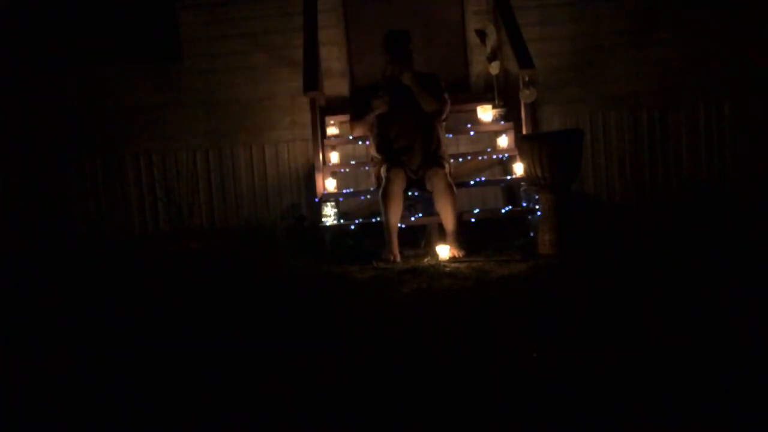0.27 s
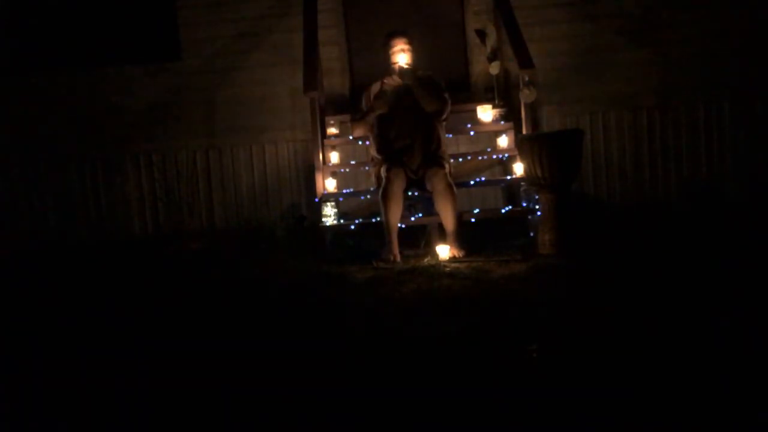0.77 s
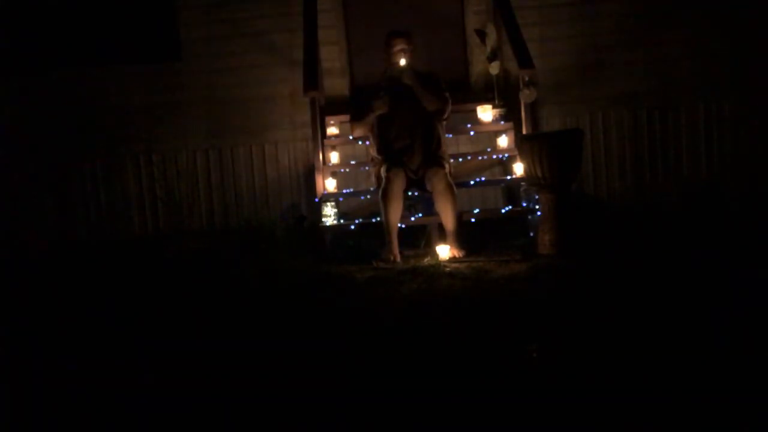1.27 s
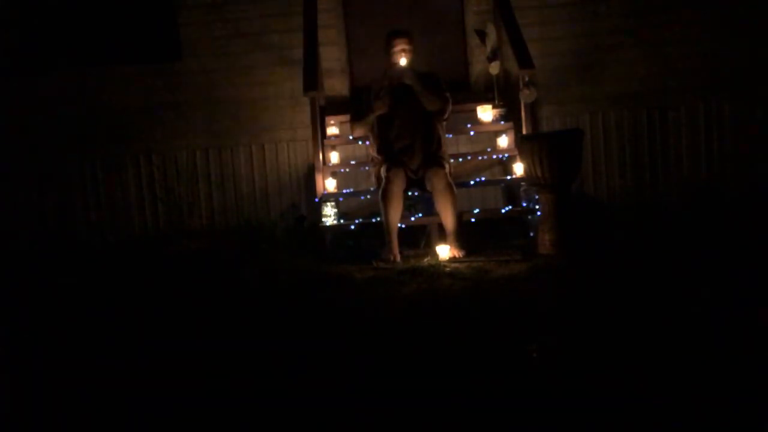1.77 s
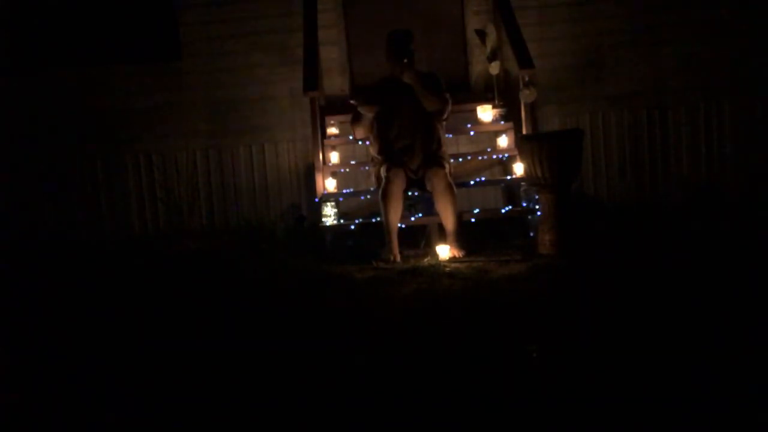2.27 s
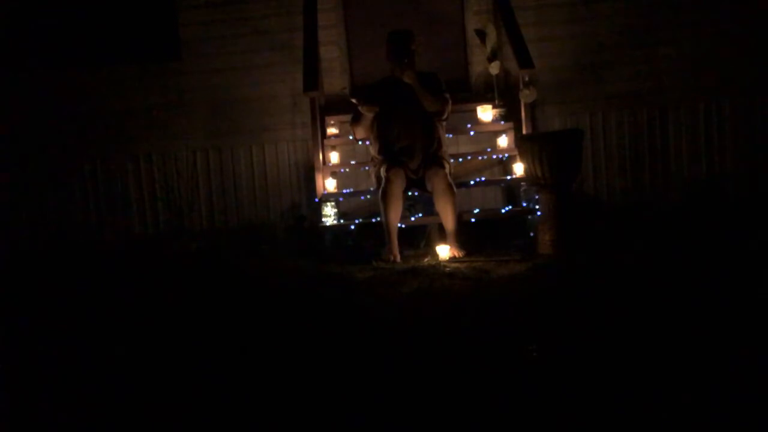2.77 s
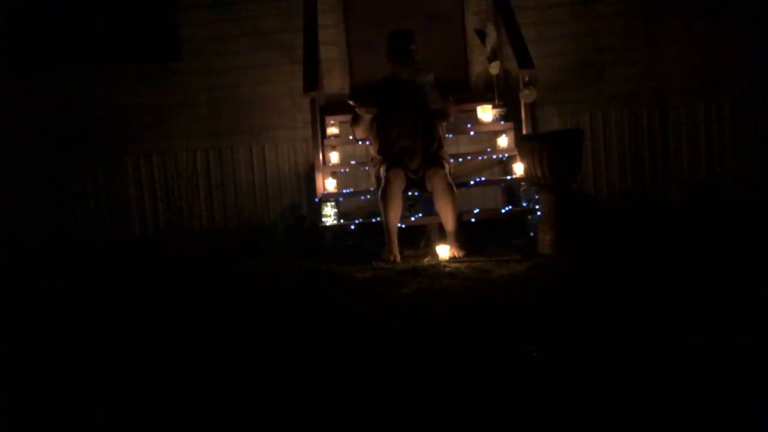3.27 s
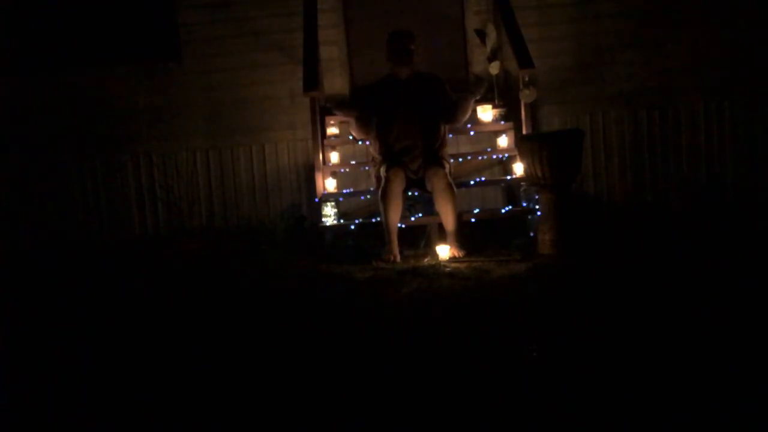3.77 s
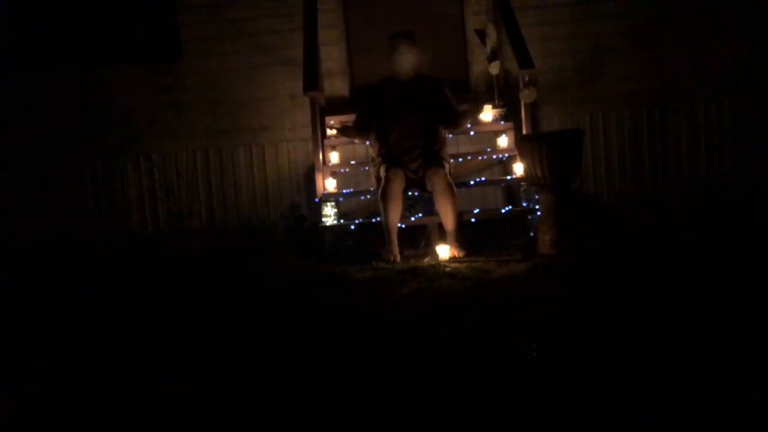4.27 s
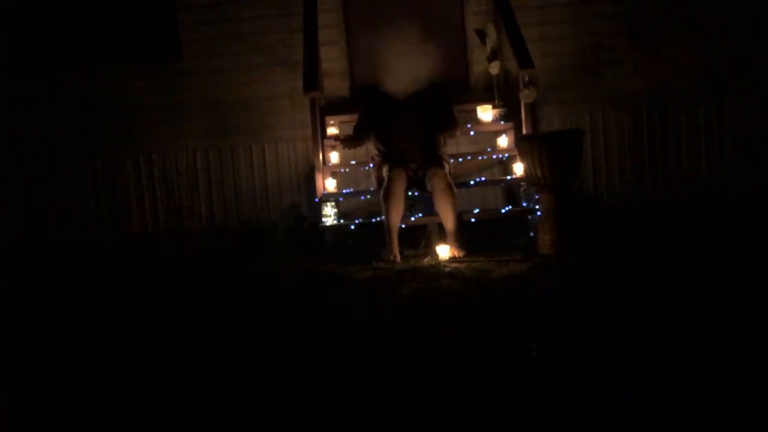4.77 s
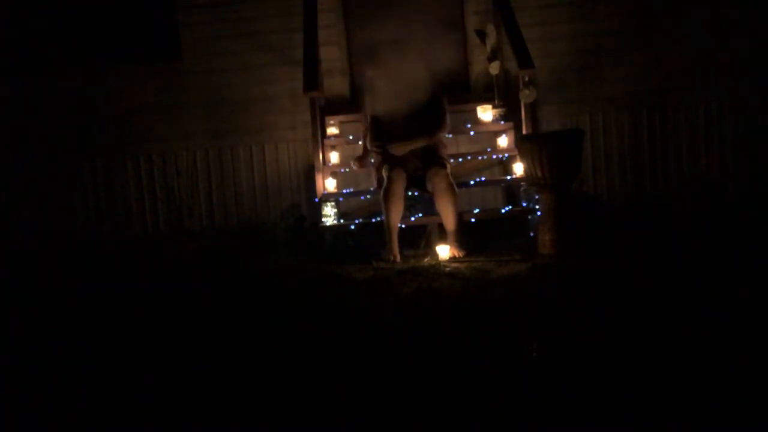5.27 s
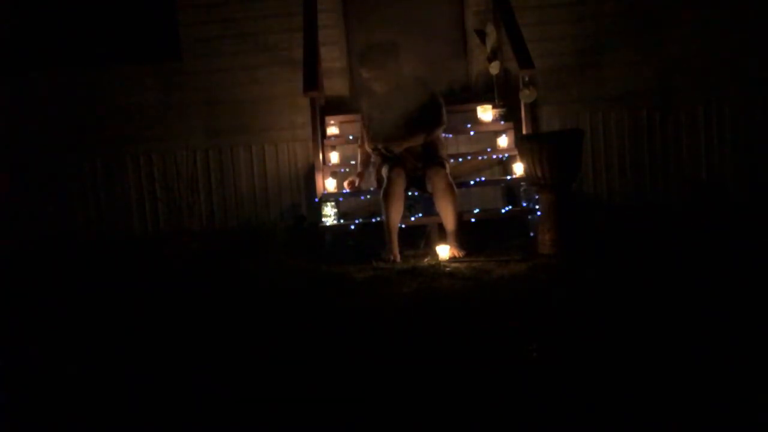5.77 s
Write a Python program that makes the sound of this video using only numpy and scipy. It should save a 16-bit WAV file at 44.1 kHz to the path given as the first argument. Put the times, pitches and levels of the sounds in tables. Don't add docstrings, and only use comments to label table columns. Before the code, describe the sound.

Outdoors at night, a crowd of katydids dominates with raspy phrases swelling about twice a second, never quite silent. A lighter clicks sharply at half a second, and two tiny taps follow near two seconds. Faint frog pips, distant engine, hum and traffic lie below. Late, soft knocks sound on wooden steps. One microphone, the same in both channels.

```python
import sys
import numpy as np
from scipy import signal
from scipy.fft import rfft, irfft, next_fast_len
from scipy.io import wavfile
from scipy.ndimage import uniform_filter1d, map_coordinates

SR = 44100
rng = np.random.default_rng(int(sys.argv[2]) if len(sys.argv) > 2 else 0)


def to_wav(s):
    ch = np.atleast_2d(s).T
    pcm = np.round(np.clip(ch, -1, 1) * 32767)
    wavfile.write(sys.argv[1], SR, pcm.astype(np.int16))


def voltage_ratio(level):
    return 10 ** (np.asarray(level, float) / 20)


N = 265261
TIME = np.arange(N) / SR


def unit(x):
    return x / np.sqrt(np.mean(x ** 2) + 1e-20)


def wobble(rate_hz):
    knots = rng.standard_normal(int(N * rate_hz / SR) + 4)
    return map_coordinates(knots, [np.arange(N) * rate_hz / SR])


def swells(rows):
    return sum(db * np.exp(-((TIME - s) / half_s) ** 2) for s, half_s, db in rows)


def filtered(x, response):
    m = next_fast_len(N + SR // 2)
    return irfft(rfft(x, m) * response(np.fft.rfftfreq(m, 1 / SR)), m)[:N]


def resonance(f, hz, width_hz):
    damping = 1j * f * width_hz
    return damping / (hz * hz - f * f + damping)


def coloured(x, spectrum):
    f, db = np.transpose(spectrum)
    return unit(filtered(x, lambda hz: voltage_ratio(np.interp(np.log(hz + 1), np.log(f + 1), db))))


def add_at(out, start_s, sound):
    out[..., round(start_s * SR):][..., :sound.shape[-1]] += sound


def singers(teeth_hz, sharp, stroke_db, blur):
    total = np.zeros(N)
    for _ in range(3):
        rate = teeth_hz * (1 + 0.05 * rng.standard_normal() + 0.04 * wobble(8))
        cycle = np.cumsum(rate) / SR % 1
        strokes = voltage_ratio(stroke_db * wobble(14))
        total += unit(strokes * np.exp(-sharp * cycle) * rng.standard_normal(N))
    return unit(total) + blur * rng.standard_normal(N)


def ringing(count, lo_hz, hi_hz, life_s, spread_db):
    start, pitch, strength = rng.random((3, count, 1))
    t = np.arange(1300) / SR
    hz = lo_hz + (hi_hz - lo_hz) * pitch
    notes = voltage_ratio(spread_db * strength) * t * np.exp(-t / life_s) * np.sin(2 * np.pi * hz * t)
    at = (start * N).astype(int) + np.arange(len(t))
    return unit(np.bincount(at.ravel(), notes.ravel(), N)[:N])


# start_s, length_s, strength_db, growth_db, near_extra_db
KATYDID_PHRASES = [(-.3, 0.3, -0.9, 0.5, -1), (0.237, 0.29, -3, -3.5, 2.5), (0.618, 0.21, 1.2, 0.5, -2.5),
                   (1.057, 0.29, -3.5, 1, 0.5), (1.463, 0.23, 0.3, -2.7, -1.5), (1.843, 0.34, -3, 2.1, .3),
                   (2.298, 0.26, -2.1, 3.5, -1.5), (2.776, 0.2, -0.8, -2.5, -1.4),
                   (3.038, 0.33, -2, 2.5, 1), (3.557, 0.26, -1.5, 3.3, 0), (4, 0.25, -0.8, 1.2, -1.2),
                   (4.493, .21, -2, -2.8, -.2), (4.78, 0.31, -0.6, 4, 0), (5.313, .27, -3.5, 4.5, -0.5),
                   (5.727, .24, -1.3, 1.5, -1.5)]
# centre_s, half_width_s, level_db
HUSHES = [
    (1.04, 0.036, -2),
    (3.53, .06, -1),
    (5.31, 0.047, -2),
]


def phrasing(level_db, between_db, lag_s, near):
    attack_s, release_s = 0.13, 0.21
    syllable_s, syllable_db = 0.13, 0.72
    start, length, strength_db, growth_db, near_db = np.transpose(KATYDID_PHRASES)[..., None]
    t = np.linspace(0, N / SR, num=3000)
    since = t - lag_s - start

    def fade(v):
        return np.sin(np.pi / 2 * np.clip(v, 0, 1))

    sung = fade(since / attack_s) * fade((length + release_s - since) / release_s)
    sung *= voltage_ratio(syllable_db * np.cos(2 * np.pi * (since - 0.1) / syllable_s))
    growth = growth_db * (np.clip(since / length, 0, 1) - 0.5)
    sung *= voltage_ratio(strength_db + growth + near * near_db)
    gain = voltage_ratio(level_db) * np.sqrt(voltage_ratio(2 * between_db) + np.sum(sung ** 2, axis=0))
    hush_depth = 1.8 if near else 1
    return voltage_ratio(swells(HUSHES) * hush_depth) * np.interp(TIME, t, gain)


# pitch_hz, density_db (per Hz)
CROWD_WINGS = [(1400, -43), (2400, -6.5), (2680, -1), (2830, -4), (3000, 1.5), (3250, -1), (3450, -3.5),
               (3800, -13), (4940, -15), (8360, -120)]
# pitch_hz, density_db (per Hz)
DEEP_WINGS = [(560, -77), (950, -30), (1030, -29), (1330, -13), (1680, -10.5), (1950, -1), (2160, 0.5),
              (2500, -10.5), (3250, -5), (5500, -120)]
# pitch_hz, density_db (per Hz)
BRIGHT_WINGS = [(2180, -41.5), (3700, -3), (4530, 0), (4990, -3), (5410, -1), (6040, -8), (6730, -23.5),
                (8500, -33.5), (11000, -46), (18700, -120)]
# pitch_hz, density_db (per Hz)
NEAR_FIZZ = [(4700, -54), (8000, -44), (8700, -30), (9300, -10.5), (10300, -10.5), (10900, -3.5),
             (12500, 0), (14500, 1), (15200, 4.5), (15800, 0), (16000, -60)]
# level_db, stragglers_between_phrases_db, lag_s
GROUPS = [
    (-38.5, -5, -0.0081),
    (-45, -3, -0.035),
    (-39, -5.5, -0.014),
    (-55.5, -4.5, -0.025),
]


def katydids():
    rasp = singers(teeth_hz=129.95, sharp=2.0, stroke_db=2.0, blur=1.5)
    rasp += 0.23 * ringing(count=600, lo_hz=2501, hi_hz=3506, life_s=0.0068, spread_db=11)
    growl = singers(teeth_hz=89.85, sharp=1.6, stroke_db=1.5, blur=1.0)
    growl += 0.16 * ringing(count=400, lo_hz=1764, hi_hz=2384, life_s=0.0061, spread_db=7)
    buzz = singers(teeth_hz=130.1, sharp=2, stroke_db=2.2, blur=1.3)
    buzz += 0.2 * ringing(count=500, lo_hz=4400, hi_hz=4700, life_s=0.009, spread_db=13)
    fizz = singers(teeth_hz=385, sharp=1.9, stroke_db=0.5, blur=0.94)

    crowd, deep, bright, near = GROUPS
    return (phrasing(*crowd, near=False) * coloured(rasp, CROWD_WINGS)
            + phrasing(*deep, near=False) * coloured(growl, DEEP_WINGS)
            + phrasing(*bright, near=False) * coloured(buzz, BRIGHT_WINGS)
            + phrasing(*near, near=True) * coloured(fizz, NEAR_FIZZ))


# start_s, peak_db, body_db, t60_s
LIGHTER_CLICKS = [
    (0.4880, -25, -21, 0.006),
    (0.4893, -26.5, -17, 0.0066),
    (0.497, -51, -22, 0.059),
]
# pitch_hz, width_hz, level_db
LIGHTER_MODES = [
    (1080, 230, 3),
    (1840, 310, 7),
    (3550, 490, 10.5),
    (4940, 1430, 4),
    (6700, 1600, 2.5),
    (9000, 2500, -6.5),
    (13600, 4500, -14),
]


def lighter():
    scrape, jolt, t = np.zeros(N), np.zeros(N), np.arange(1500) / SR
    for start_s, peak_db, body_db, t60 in LIGHTER_CLICKS:
        burst = rng.standard_normal(len(t)) * (1 - np.exp(-t / 0.001)) * voltage_ratio(-60 * t / t60)
        add_at(scrape, start_s, voltage_ratio(peak_db + 16) * burst)
        jolt[round(start_s * SR)] = voltage_ratio(peak_db + body_db + 40.5)

    def ring(f, modes):
        low_cut = (1j * f / (580 + 1j * f)) ** 3
        return low_cut * sum((-1) ** k * voltage_ratio(db) * resonance(f, hz, width_hz)
                             for k, (hz, width_hz, db) in enumerate(modes))

    metal = filtered(scrape, lambda f: ring(f, LIGHTER_MODES[3:]))
    return metal + filtered(jolt, lambda f: ring(f, LIGHTER_MODES[:3]))


# start_s, tick_db, thump_db
TAPS = [
    (1.903, -50.5, -50.5),
    (1.939, -55, -64),
]


def taps():
    out, t = np.zeros((2, N)), np.arange(900) / SR
    for start_s, tick_db, thump_db in TAPS:
        level_db = np.array([[tick_db + 14.5], [thump_db + 20]])
        add_at(out, start_s, voltage_ratio(level_db - 60 * t / 0.011) * rng.standard_normal((2, len(t))))
    tick = filtered(out[0], lambda f: resonance(f, hz=8500, width_hz=3000) ** 2)
    thump = filtered(out[1], lambda f: resonance(f, hz=810, width_hz=1100) ** 2)
    return tick + thump


# start_s, peak_db, brightness_db
KNOCKS = [
    (5.619, -46, -10),
    (5.677, -40, -2.5),
    (5.699, -52, -5),
    (5.792, -53, -3),
    (5.909, -51, -16),
    (6.009, -51, -14),
]
# pitch_hz, level_db, t60_s
BOARD_MODES = [(346, -5.5, 0.14), (488, 2.5, 0.056), (566, 1.5, 0.057), (656, 4.5, 0.035), (725, -4, 0.044),
               (915, 6, 0.028), (1080, -7, 0.052), (1250, -1, 0.04)]


def steps():
    out, t = np.zeros(N + SR), np.arange(SR // 5) / SR
    for start_s, peak_db, bright_db in KNOCKS:
        ring = np.zeros(len(t))
        for hz, level_db, t60 in BOARD_MODES:
            mode_db = level_db + (hz > 620) * (bright_db + 3) + rng.uniform(-1.0, 1.8)
            ring += voltage_ratio(mode_db - 60 * t / t60) * np.sin(2 * np.pi * hz * t)
        scuff = 3 * uniform_filter1d(rng.standard_normal(len(t)), size=24)
        ring += voltage_ratio(bright_db - 60 * t / 0.012) * scuff
        add_at(out, start_s, voltage_ratio(peak_db - 3) * (1 - np.exp(-t / 0.00092)) * ring)
    return out[:N]


# start_s, peak_db, pitch_hz
FROG_PIPS = [(0.243, -56, 1160), (1.178, -58, 1130), (1.714, -55, 1120), (1.76, -60, 1080),
             (3.158, -59, 1090), (3.649, -58, 1120), (4.872, -54, 1130), (5.209, -55, 1190)]


def frog():
    out, t = np.zeros(N + SR), np.arange(SR // 10) / SR
    for start_s, peak_db, hz in FROG_PIPS:
        envelope = voltage_ratio(peak_db + 10 - 60 * t / 0.023) * (1 - np.exp(-t / 0.001))
        add_at(out, start_s, envelope * np.sin(2 * np.pi * hz * t))
    return out[:N]


def tone(hz, unsteady_db):
    return np.sqrt(2) * voltage_ratio(unsteady_db * wobble(6)) * np.sin(2 * np.pi * np.cumsum(hz) / SR)


# time_s, firing_order_db, second_order_db
ENGINE_LEVELS = [(0, -62.5, -83), (.7, -47.5, -79), (1.0, -49, -92), (1.3, -58.5, -65), (1.5, -65, -68),
                 (1.8, -51, -76), (2.15, -56.5, -66), (2.5, -59.5, -74), (3.0, -63.5, -75),
                 (3.75, -67, -87), (4.1, -76, -69), (4.85, -67, -68), (5.15, -57.5, -59),
                 (5.65, -49.5, -64), (5.85, -58.5, -69.5), (6.02, -59, -71)]


def engine():
    time_s, first_db, second_db = np.transpose(ENGINE_LEVELS)
    hz = 141.7 - 1.17 * TIME
    first = voltage_ratio(np.interp(TIME, time_s, first_db)) * tone(hz, unsteady_db=1.5)
    return first + voltage_ratio(np.interp(TIME, time_s, second_db)) * tone(2 * hz, unsteady_db=1.5)


def machine_hum():
    return voltage_ratio(-52) * tone(np.full(N, 58.7), unsteady_db=1.1)


# pitch_hz, density_db (per Hz)
TRAFFIC_COLOUR = [(20, -44), (31, -21), (44, -6.5), (75, -1), (97, -6.5), (118, -4), (160, -5), (178, -14),
                  (197, -8), (214, -21), (232, -10), (252, -21), (300, -24.5), (330, -44)]
# nearest_s, half_width_s, swell_db
PASSES = [
    (1.35, 0.54, 7),
    (2.0, 0.23, 1.5),
    (3.3, 0.086, 1.5),
    (5.3, 0.57, 4.5),
]


def traffic():
    rumble = coloured(rng.standard_normal(N), TRAFFIC_COLOUR)
    deepest = filtered(rumble, lambda f: 1 / (1 + (f / 108) ** 8))
    passing_db = swells(PASSES)
    town = voltage_ratio(2 + 0.35 * passing_db) * deepest
    vehicles = voltage_ratio(passing_db - 2) * (rumble - deepest)
    return voltage_ratio(-54) * (town + vehicles)


# pitch_hz, density_db (per Hz)
BREEZE_COLOUR = [(180, -35), (300, 1), (471, -4.5), (495, -3.5), (612, -3), (890, -8.5), (1100, -17.5),
                 (1430, -18), (2420, -120)]
# centre_s, half_width_s, swell_db
PUFFS = [
    (1.87, 0.4, 1.5),
    (4.1, .15, 3.5),
    (4.6, 0.22, 2.5),
    (5.3, .2, 3),
]


def breeze():
    level_db = -73.5 + swells(PUFFS) + 1.3 * wobble(2.7)
    return voltage_ratio(level_db) * coloured(rng.standard_normal(N), BREEZE_COLOUR)


def scene():
    mono = katydids() + lighter() + taps() + steps() + frog()
    mono += engine() + machine_hum() + traffic() + breeze()
    return np.array([mono, mono])


def roll_off(x):
    return signal.sosfilt(signal.butter(12, 16950, fs=SR, output="sos"), x)


def record(dry):
    kept = filtered(dry[0], lambda hz: hz < 15730)
    return roll_off(np.array([kept, kept]))


dry = scene()
out = record(dry)
to_wav(out)
```